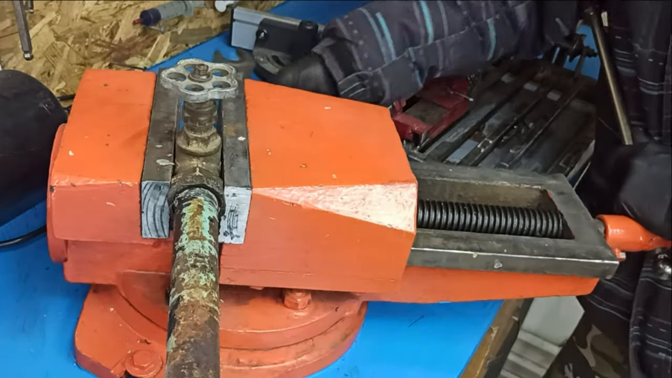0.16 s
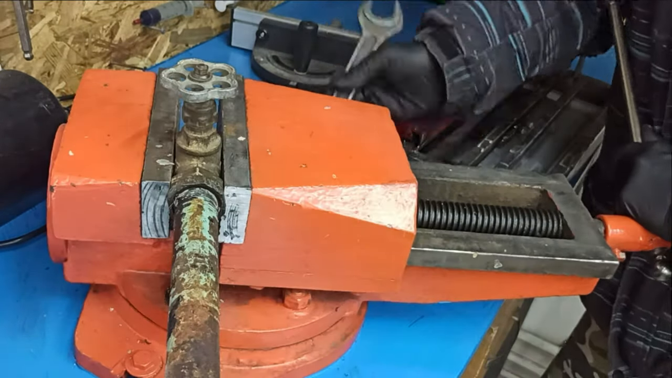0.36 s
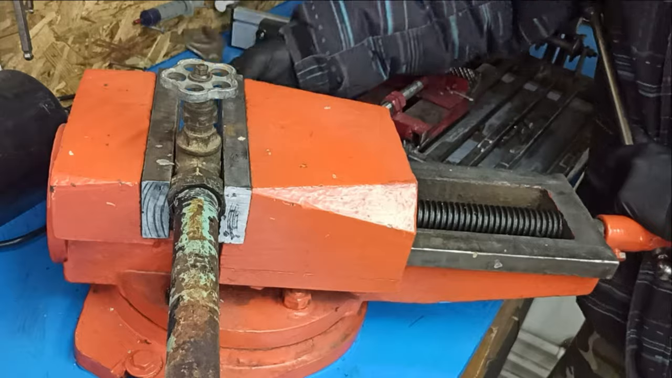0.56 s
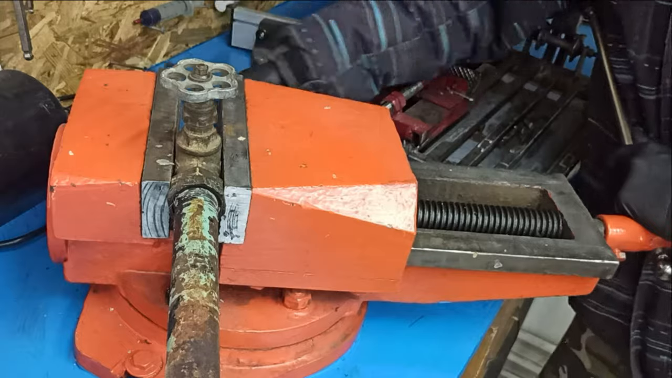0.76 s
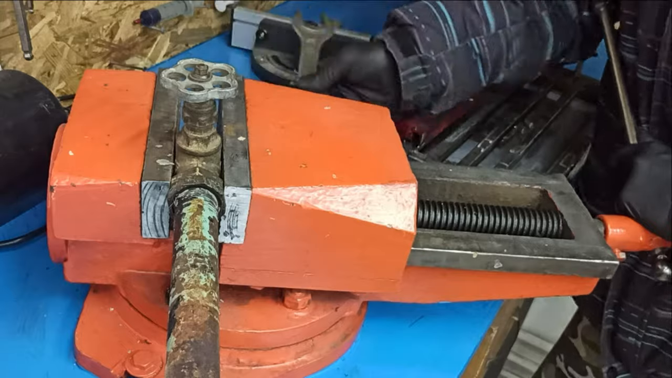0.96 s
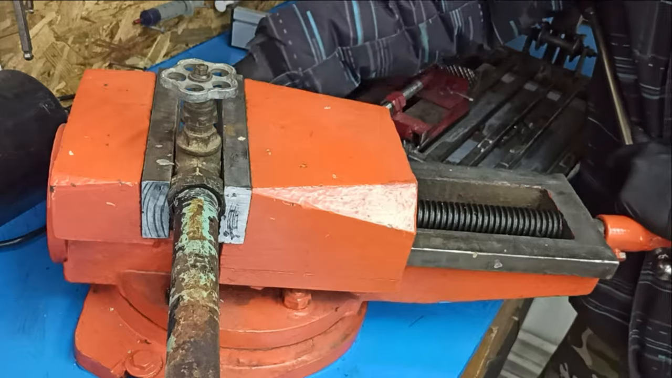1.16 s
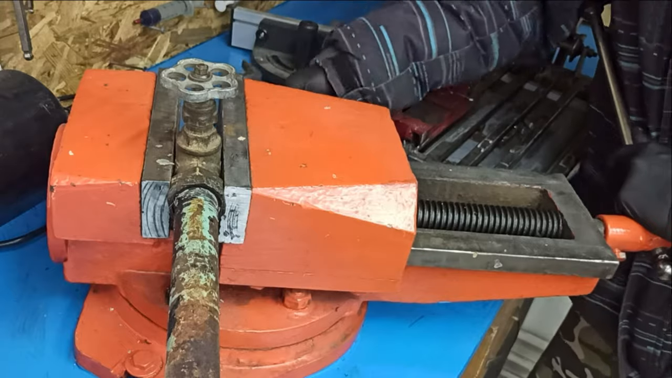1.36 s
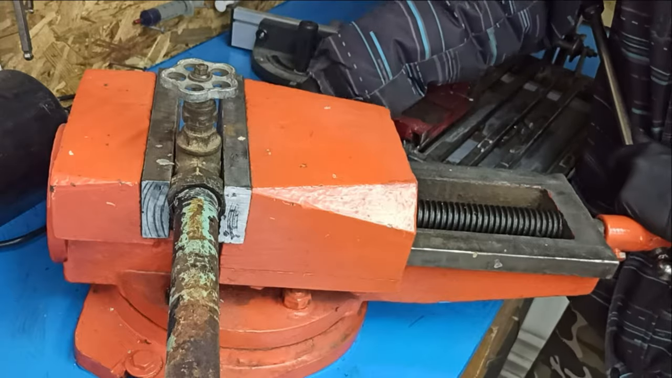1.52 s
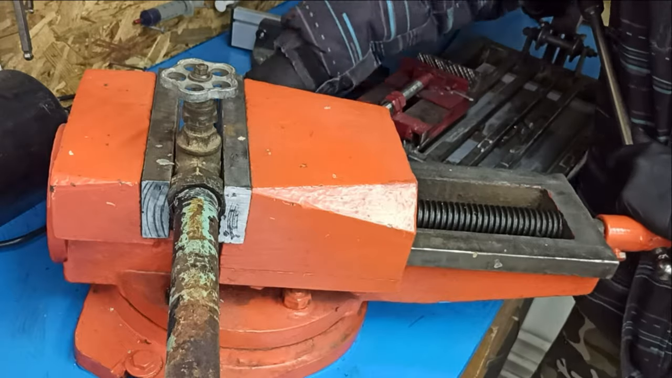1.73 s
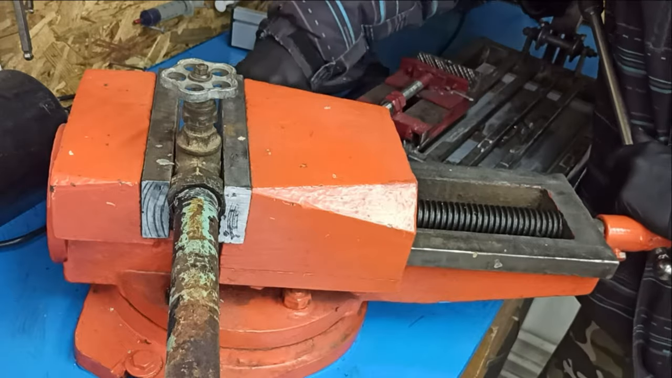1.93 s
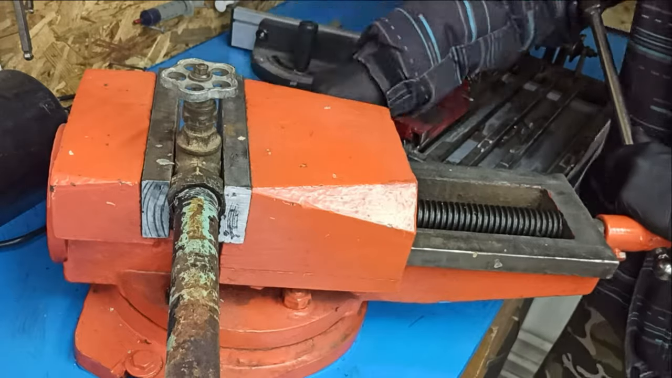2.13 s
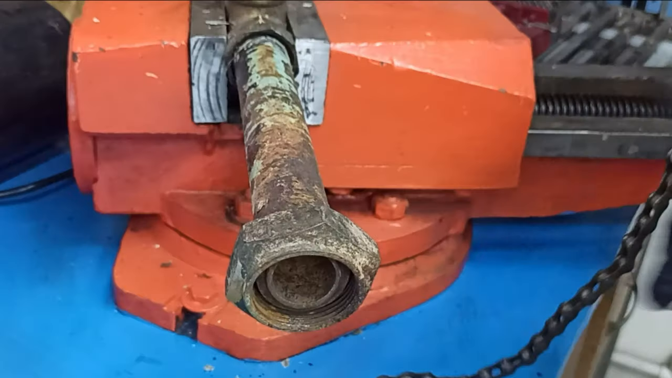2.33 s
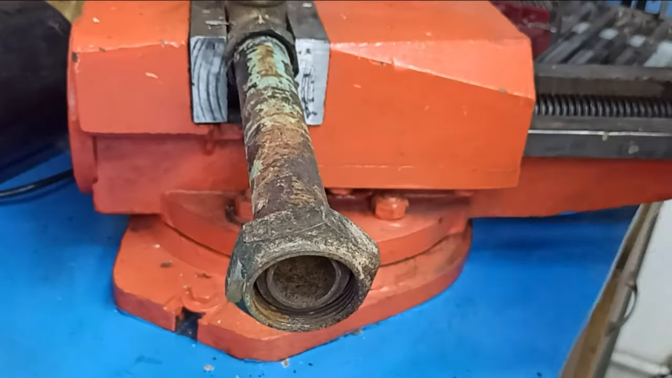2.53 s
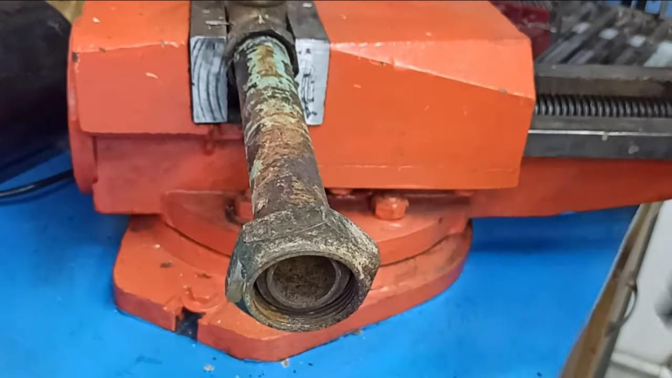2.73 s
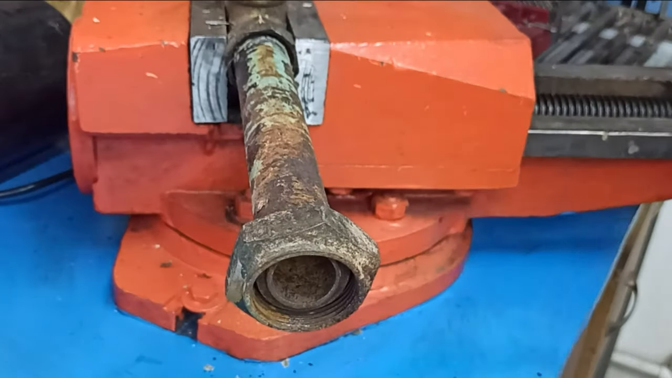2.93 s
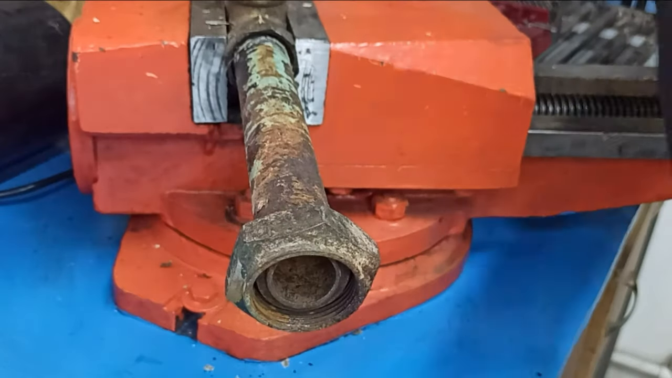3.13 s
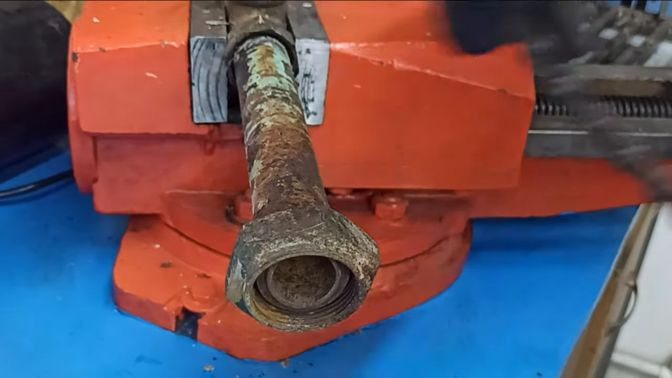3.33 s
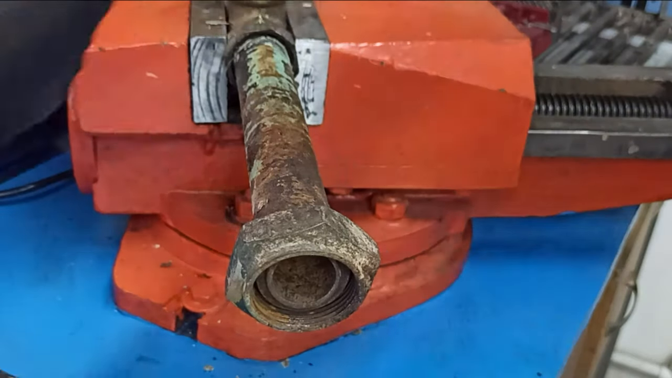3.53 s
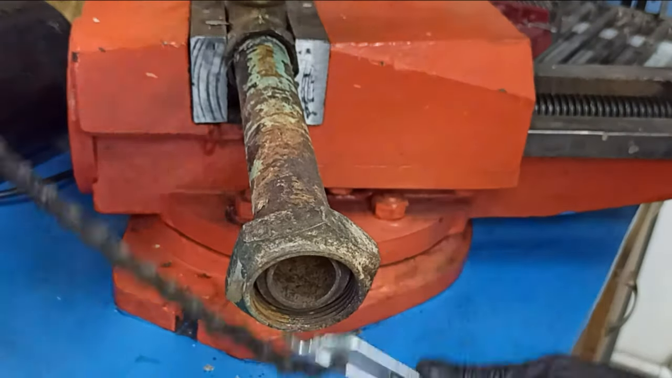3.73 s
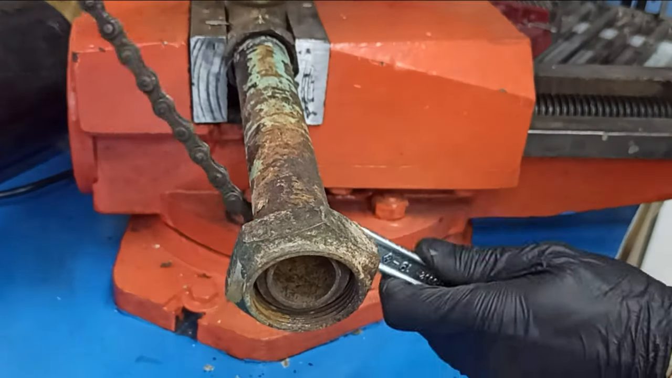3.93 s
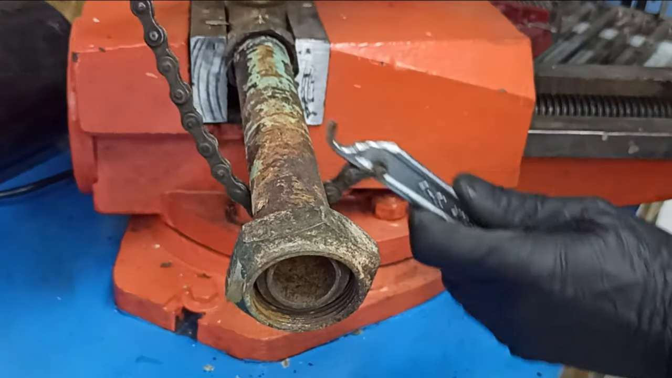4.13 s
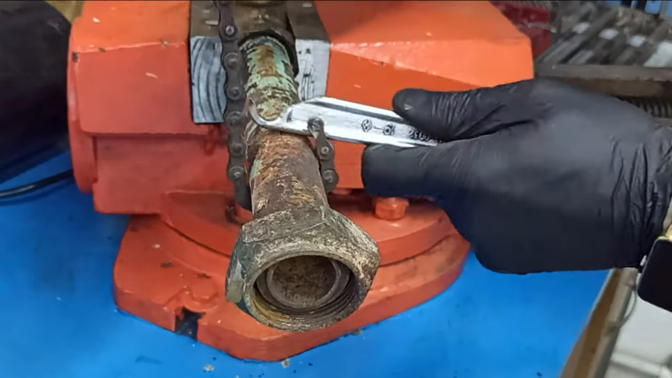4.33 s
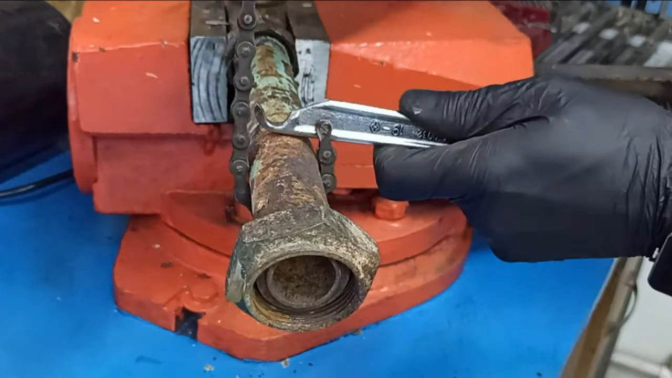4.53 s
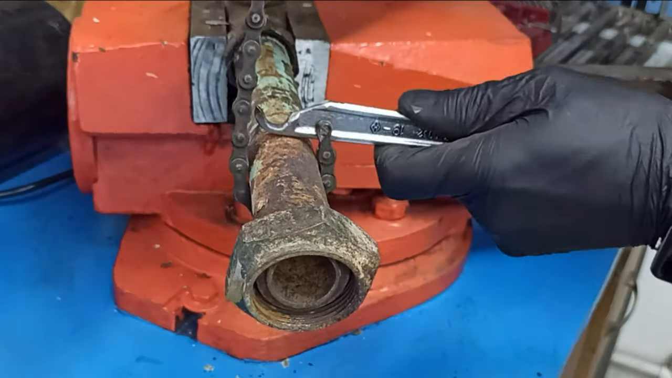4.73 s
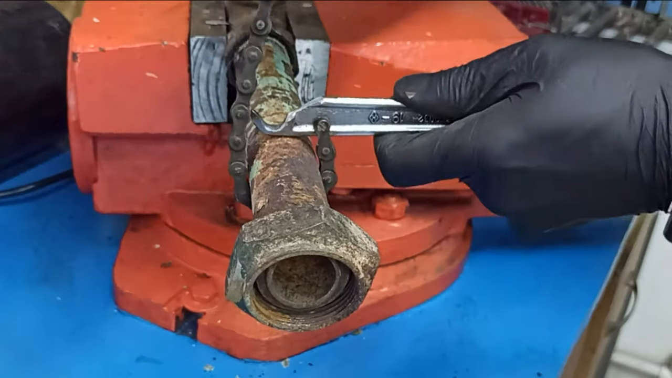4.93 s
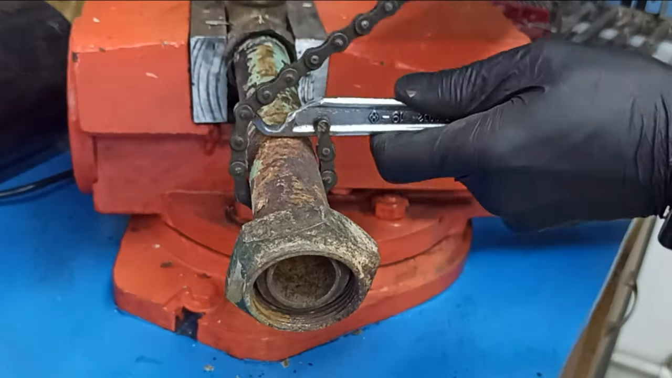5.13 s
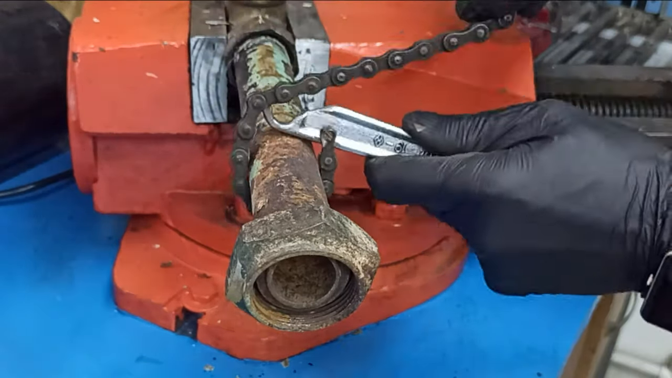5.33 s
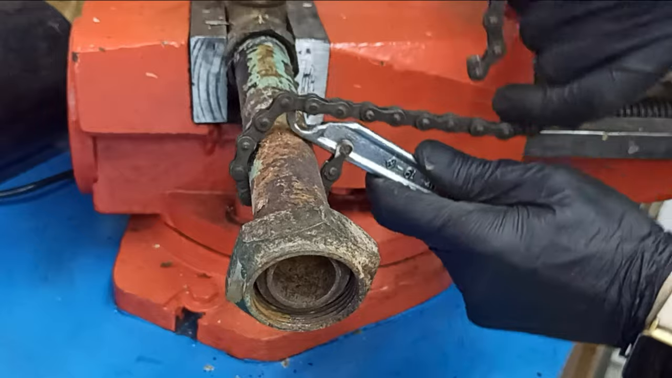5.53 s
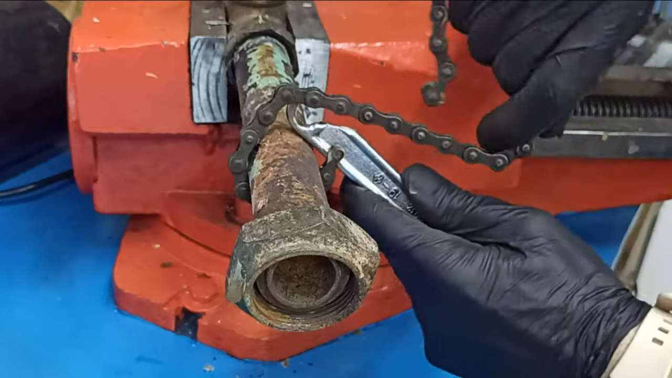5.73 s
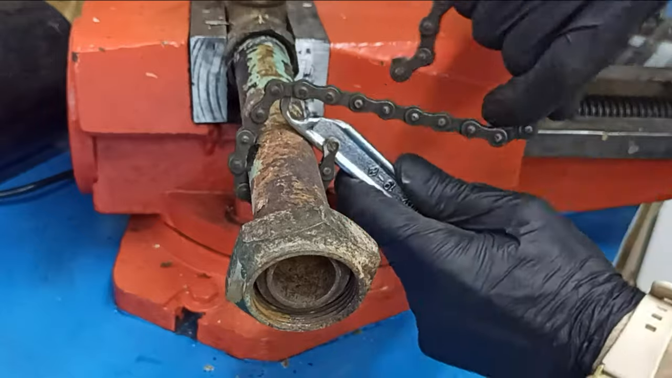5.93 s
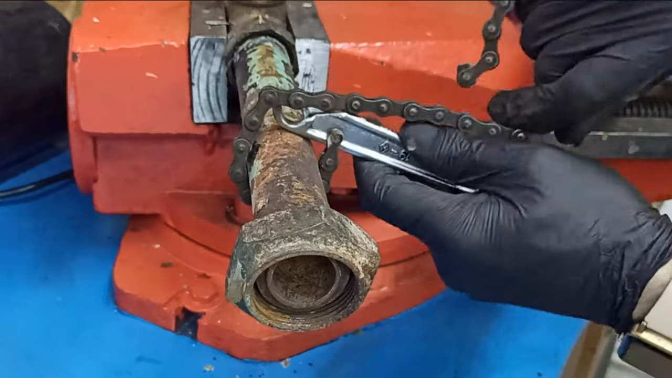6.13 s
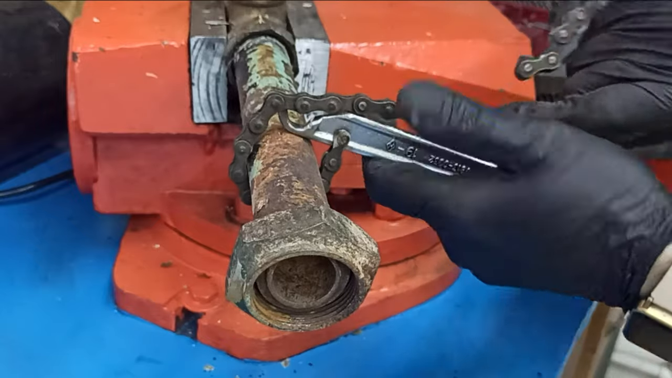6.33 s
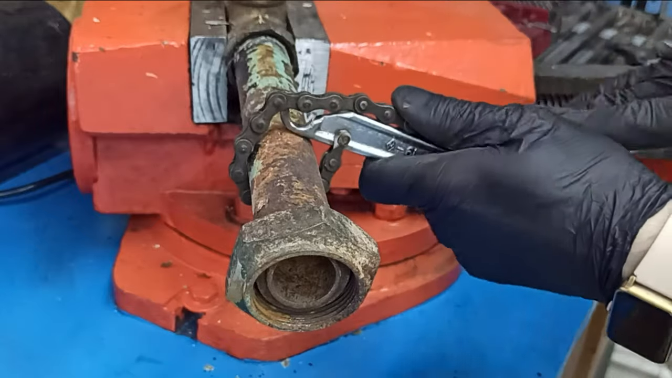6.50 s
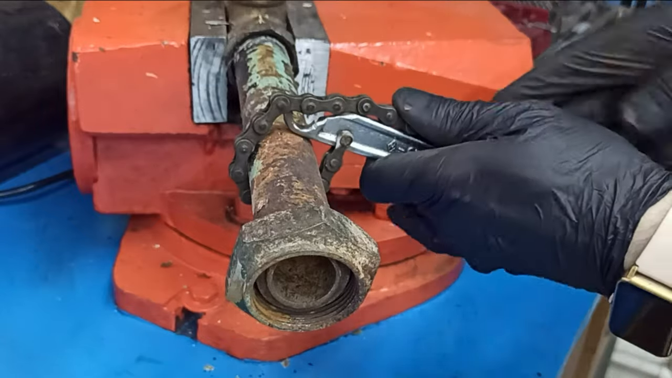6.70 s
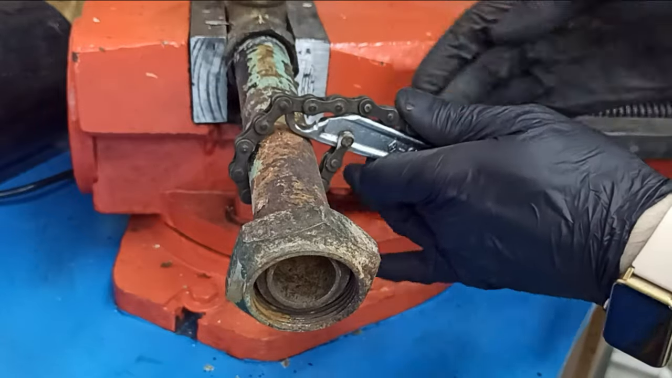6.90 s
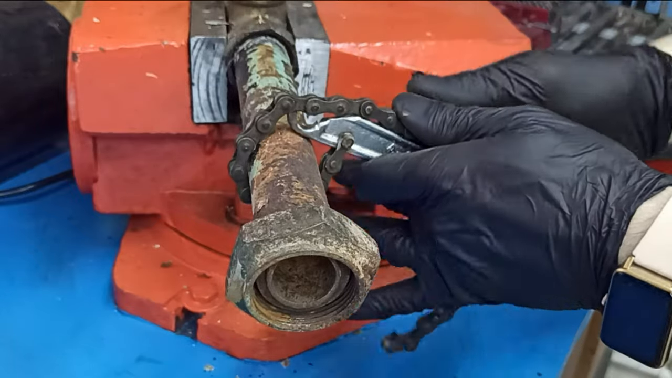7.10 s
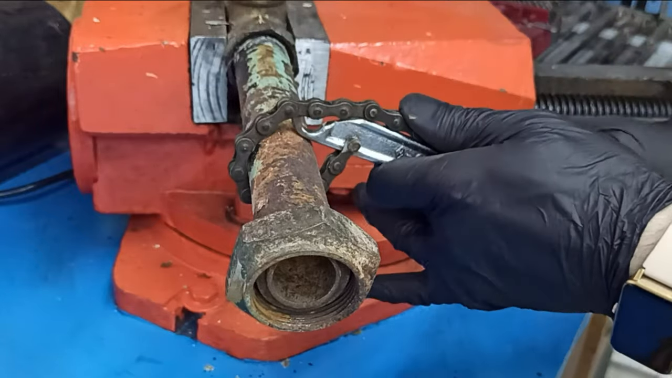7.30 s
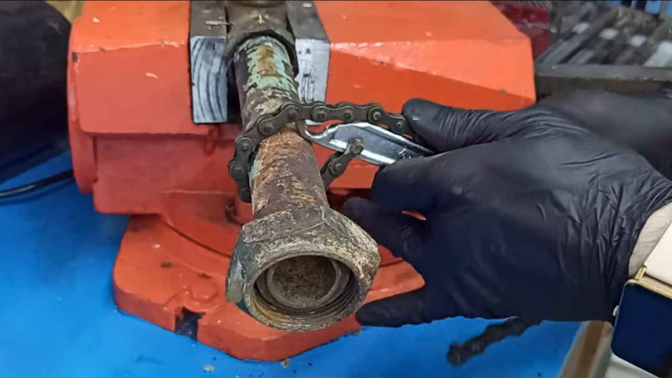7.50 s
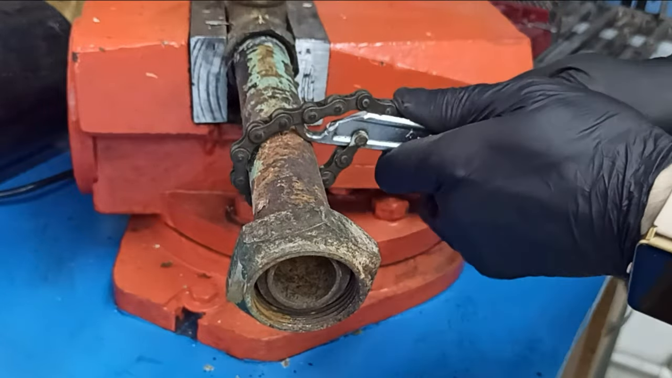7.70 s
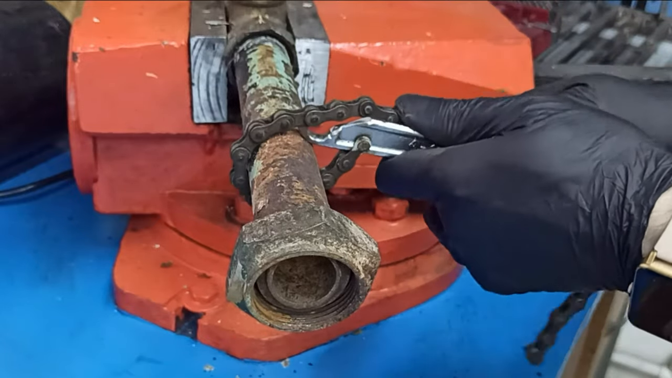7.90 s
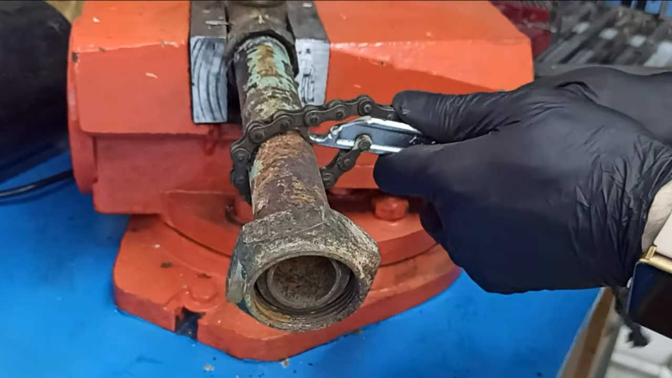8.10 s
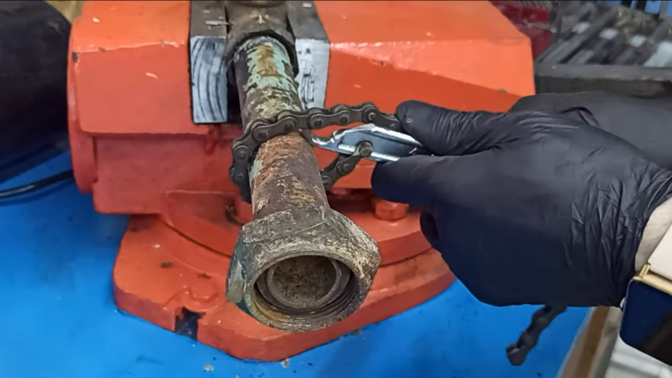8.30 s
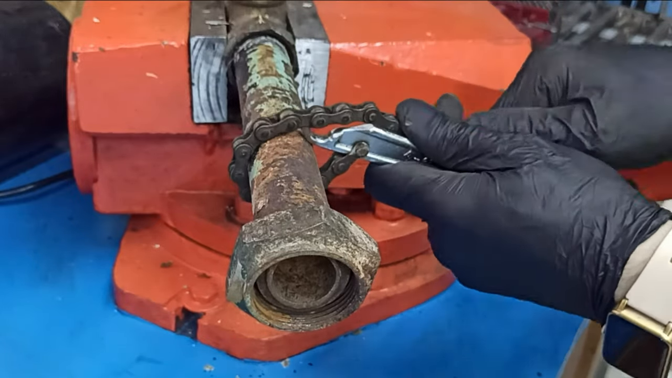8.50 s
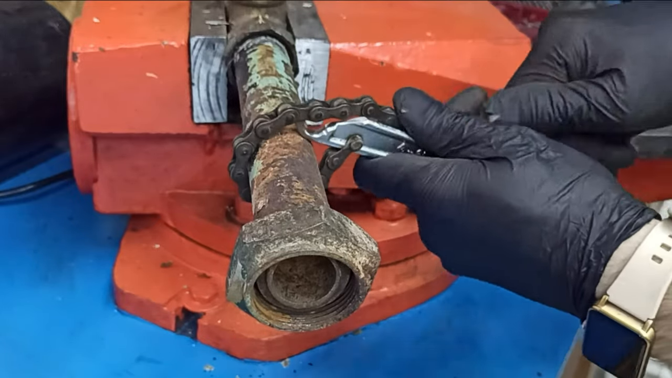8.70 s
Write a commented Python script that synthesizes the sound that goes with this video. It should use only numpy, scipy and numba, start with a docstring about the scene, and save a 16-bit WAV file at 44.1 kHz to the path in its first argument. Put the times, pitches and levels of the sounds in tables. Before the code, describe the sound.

Gloved hands rummage through clattering hand tools, drop a chain on steel, then wrap it around a rusty pipe with soft clinks and low hums.

```python
"""In a small workshop, at a bench with a heavy vice, a hand rummages among tools that knock and skid on the top.
Then, heard from a second, closer spot, a chain drops and drags over the steel top and wraps a clamped pipe.
Blows ring clusters of decaying modes; drags are gritty noise through modes; cloth is coloured grit.
The pipe hums as a wavering tone whenever the chain tugs it. A short room tail follows blows and drags;
rustle and hum stay close and dry, over a bed of still air."""
import sys
import numpy as np
from scipy import signal
from scipy.fft import rfft, irfft, next_fast_len
from scipy.io import wavfile
from scipy.ndimage import uniform_filter1d
from numba import njit

SR = 44100
rng = np.random.default_rng(int(sys.argv[2]) if len(sys.argv) > 2 else 0)


def wrap_up_sound(samples):
    """Save the sound to the file named by the first command line argument, as 16-bit audio."""
    columns = np.atleast_2d(samples).T
    # keep every value between -1 and 1, then stretch to whole-number steps
    tamed = np.clip(columns, -1, 1)
    steps = np.round(tamed * 32767).astype(np.int16)
    wavfile.write(sys.argv[1], SR, steps)


N = 385875

COLOUR_CHANGE_S = 2.232  # the colour of the whole sound changes here
TOP_HZ = 16900  # upper limit of what is heard

# Blows: thud, knock, clank and tick are relative to level_db; ring_s is a base that each mode scales.
# tools knocking on the bench: start_s, level_db, thud_db, clank_db, tick_db, ring_s
TOOL_KNOCKS = [(0.0528, -20, -0.5, -3, -3.5, 0.076), (0.164, -24, 0, -0.5, -8, 0.043),
               (0.197, -21.5, -9.5, -9, -16.5, 0.093), (0.278, -42.5, -19, -8, -7, 0.22),
               (0.388, -24, -3.5, -18, -30, 0.14), (0.4105, -20.5, -7, -55, -35, 0.082),
               (0.66, -31, -13, 2, -19, 0.057), (0.699, -12, -12.5, -26, -19, 0.035),
               (0.834, -35, -5.5, -27, -55, 0.11), (1.002, -30.5, -11.5, -12, -15.5, 0.083),
               (1.129, -29.5, -5, -6.5, -6, 0.067), (1.159, -36.5, -12, 21.5, -18, 0.076),
               (1.171, -10.5, -6.5, -22, -16, 0.067), (1.234, -10, -8.5, -7.5, -11.5, 0.043),
               (1.326, -43, -5, -19, -35, 0.13), (1.402, -31, 4, 2.5, 0.5, 0.098),
               (1.651, -0.5, -31, -16.5, -31.5, 0.089), (1.703, -9, -17.5, -14.5, -45, 0.098),
               (1.832, -37.5, -19.5, -16.5, -24, 0.16), (1.864, -24, -25.5, -28, -32, 0.11),
               (2.001, -20, -8.5, -3, -11, 0.12)]
# tools skidding on the bench: start_s, level_db, thud_db, clank_db, tick_db, length_s
TOOL_SKIDS = [(0.073, -44, 11, -9, -7, 0.015), (0.351, -33.5, -4.5, -28, -29, 0.025),
              (0.417, -33.5, -2, -0.5, -6, 0.039), (0.526, -29.5, -1, -21, -46, 0.035),
              (0.655, -25.5, -3, -10, 4, 0.018), (0.889, -39.5, -4, -3.5, -2.5, 0.037),
              (0.931, -38, -2, -3.5, -22, 0.028), (1.081, -33, -9.5, -14, -9.5, 0.028),
              (1.436, -34.5, -4.5, -8.5, -5.5, 0.025), (1.504, -30.5, -21.5, -17.5, -17.5, 0.024),
              (1.536, -39, -20.5, -21, -21, 0.027), (1.562, -24.5, -25.5, -3.5, -21, 0.02),
              (1.663, -15.5, -23.5, -17, -28.5, 0.022), (2.171, -40, -30, -5, -3, 0.023)]
# chain links hitting the steel top; the last row is a short, dull knock:
# start_s, level_db, thud_db, clank_db, tick_db, ring_s
STEEL_TOP_HITS = [(2.364, -13, -9, -4.5, -14, 0.06), (2.393, -21, -34, 5.5, -3.5, 0.084),
                  (2.435, -34, -32, 1.5, -16, 0.39), (2.509, -30, -32, -6, -33, 0.088),
                  (2.526, -44.5, 18, 25.5, 8.5, 0.097), (2.588, -48, 5, 18.5, 12.5, 0.04),
                  (2.61, -56.5, -3, 21, 14, 0.05), (2.691, -46, -3, -18, -28, 0.09),
                  (2.802, -50, -0.5, 16, -18, 0.12), (3.635, -47.5, 11, -45, -50, 0.0097)]
# chain and wrench hitting the pipe: start_s, level_db, knock_db, clank_db, tick_db, ring_s
PIPE_TAPS = [(3.91, -48, 15.5, 10.5, 6.5, 0.069), (4.074, -46, -10.5, -11.5, -0.5, 0.11),
             (4.2287, -60, -1.5, -2, -19, 0.16), (4.3479, -47, 9, 4.5, 0, 0.077),
             (4.3843, -45.5, -0.5, -5, -3, 0.14), (4.838, -60, -7, -7, 6.5, 0.1),
             (5.0013, -60.5, 0.5, -1.5, -11, 0.072), (5.208, -44, -2.5, -8, -0.5, 0.092),
             (5.645, -65.5, -0.5, 3, -2, 0.091), (6.1034, -58.5, -9, 4, -10.5, 0.096),
             (6.2096, -49.5, -33.5, -18, -1, 0.054), (6.3358, -38, -12, -7, -0.5, 0.074),
             (6.3888, -45, -28, -24, -1, 0.025), (6.543, -51, -15, -2.5, -1, 0.049),
             (6.824, -48, -3.5, -8, 8.5, 0.063), (7.0373, -53.5, -2, 1.5, 13, 0.087),
             (7.232, -49, -22, -5, 1, 0.2), (7.649, -58, -4, -5, 14, 0.095),
             (7.73, -36, -10.5, -6, 7.5, 0.063), (7.752, -42.5, -10.5, -1.5, 12, 0.093),
             (7.7822, -31, -8, -12, 9, 0.093), (7.7918, -28.5, -8, 0.5, 16, 0.026),
             (7.806, -56.5, 0, 15.5, -12, 0.22), (8.4104, -59.5, -9.5, -5, -10.5, 0.26),
             (8.53, -66, 10.5, 1.5, -7, 0.042), (8.624, -63.5, 3, 1, -12.5, 0.052),
             (8.7055, -58.5, 10.5, 8.5, -21, 0.026)]

# Resonances of each body, before a blow or a rub scales them: pitch_hz, level_db, ring_s (t60)
BENCH_MODES = [(225, -0.5, 0.37), (442, 2.5, 0.065), (558, 3, 0.096), (830.2, -10, 0.2), (1026, -7.5, 0.13),
               (1273, -8.5, 0.2), (1477, -10.5, 0.13), (1617, -7, 0.14), (1830, -13, .2), (2606, -6, 0.087),
               (3520, -5.5, 0.15), (5363, -10.5, 0.071)]
STEEL_TOP_MODES = [(398, 8.5, 0.21), (624, 10, 0.12), (880, 9.5, 0.031), (1173, 7.5, 0.063),
                   (1584, 2, 0.0907), (1764, -16.5, 0.084), (2564, -14, 0.13), (4850, 15, 0.0064)]
PIPE_MODES = [(115, -1, 0.21), (229.6, 4.5, 0.17), (385, -4.5, 0.086), (506.6, 3, 0.2), (639, 4, 0.22),
              (842, 4.5, 0.14), (1880, -11, 0.36), (2135, -6.5, 0.31), (2343, -4.5, 0.24),
              (2574, 0.5, 0.13)]
# something rubbed nearby: pitch_hz, level_db, ring_s (t60)
RUBBED_MODES = [(151, -15.5, 0.019), (293, 14, 0.021), (510, -1.5, 0.055), (822, -1, 0.072),
                (2127, -3, 0.02), (2310, -5.5, 0.037)]

# Moves of the hands: start_s (full level reached), hold_s, level_db
# tugs of the chain that set the clamped pipe humming: start_s, hold_s, level_db
CHAIN_TUGS = [(3.925, 0.049, -37), (4.0, 0.018, -50), (4.09, 0.06, -44.5), (4.18, 0.069, -53.5),
              (4.29, 0.091, -43), (4.37, 0.086, -40), (4.86, 0.02, -54), (4.93, 0.1, -58.5),
              (5.225, 0.02, -43), (5.33, .1, -55), (5.57, 0.11, -50.5), (5.82, 0.11, -48),
              (6.03, 0.061, -51.5), (6.16, .09, -56.5), (6.38, 0.0097, -47), (6.62, 0.33, -62.5),
              (6.92, 0.083, -57), (7.04, 0.072, -51.5), (7.28, 0.088, -51.5), (7.46, 0.13, -54),
              (7.69, 0.12, -44), (7.8, 0.03, -29), (7.865, 0.044, -42.5), (8.61, .01, -56),
              (8.72, 0.026, -48)]
# things dragged along: start_s, hold_s, level_db
DRAG_MOVES = [(0, 0.35, -58), (.52, 0.088, -56), (.672, 0.052, -52), (.88, 0.057, -47),
              (1.17, 0.094, -47.5), (1.33, 0.25, -55.5), (1.665, 0.033, -39.5), (2.04, 0.0041, -56.5),
              (2.1, 0.084, -65), (2.385, 0.053, -36.5), (2.5, 0.17, -46.5), (2.7, 0.062, -47.5),
              (2.78, 0.06, -46.5), (3.2, 0.074, -61.5), (3.305, 0.025, -61), (3.352, 0.011, -56),
              (3.41, 0.012, -51.5), (3.465, 0.016, -62), (4.02, 0.3, -71), (4.33, 0.12, -64.5),
              (5.212, 0.019, -65.5), (5.58, 0.08, -70), (6.3, 0.38, -70.5), (6.83, 0.012, -58),
              (7.03, 0.56, -70), (7.66, 0.076, -67.5), (7.79, 0.047, -57), (8.66, 0.1, -70)]
# sleeves and gloves: start_s, hold_s, level_db
CLOTH_MOVES = [(.05, 0.17, -67), (.38, 0.092, -61.5), (.685, 0.0077, -55), (.885, 0.036, -59),
               (1.17, 0.014, -49.5), (1.42, 0.0075, -52), (1.665, .03, -65), (2.005, 0.06, -63.5),
               (2.24, 0.044, -65), (2.385, 0.6, -60.5), (2.965, 0.15, -59.5), (3.135, 0.0073, -54),
               (3.185, 0.015, -57), (3.21, 0.029, -58.5), (3.29, .2, -63.5), (3.912, 0.011, -75.5),
               (4.27, .06, -75), (4.35, 0.035, -65), (6.03, 0.33, -74.5), (6.335, 0.045, -61.5),
               (6.5, 0.1, -66), (6.69, 0.011, -58), (6.85, 0.071, -65.5), (7.04, 0.04, -56.5),
               (7.125, 0.012, -54.5), (7.235, .015, -61), (7.28, 0.026, -53.5), (7.42, 0.097, -64.5),
               (7.47, 0.022, -57.5), (7.565, 0.018, -56), (7.775, 0.074, -55.5), (8.42, 0.052, -61.5),
               (8.585, 0.038, -59.5)]
# swell (dB per s), fade (dB per s), level at rest (dB)
TUG_SWELL, TUG_FADE, TUG_REST_DB = 910, 210, -68
DRAG_SWELL, DRAG_FADE, DRAG_REST_DB = 1600, 245, -77
RUSTLE_SWELL, RUSTLE_FADE, RUSTLE_REST_DB = 260, 200, -87.5

# the pipe swinging in the vice: centre pitch (Hz), pitch wander (fraction) and level wobble (dB) per unit of walk
HUM_HZ, HUM_WANDER, HUM_WOBBLE_DB = 138.5, 0.037, 2.9

# spectral colour of everything before COLOUR_CHANGE_S: pitch_hz, level_db
FIRST_PART_COLOUR = [(60, -29.5), (110, -31), (150, -14), (185, -5.5), (4000, 0), (8800, -2.5), (9300, 8.5),
                     (9800, -9), (12000, -6.5), (12600, 3), (15600, 4), (16000, -19), (17000, -22.5)]
# spectral colour of everything from COLOUR_CHANGE_S on: pitch_hz, level_db
SECOND_PART_COLOUR = [(50, -24.5), (100, -2), (4000, 2), (5600, 5), (5900, -3), (7200, -2), (7500, 7),
                      (10200, 2), (10500, -11.5), (13700, -21.5), (13900, -5.5), (15600, 0), (16000, -34.5),
                      (17000, -25.5)]
# colour of dragging grit: pitch_hz, level_db
DRAG_COLOUR = [(100, -30), (250, -10.5), (450, 5.5), (1000, 5.5), (2000, -12), (3500, -9.5), (6000, -16),
               (16000, -14.5)]
# colour of rubbing cloth: pitch_hz, level_db
CLOTH_COLOUR = [(500, -25), (1500, -13.5), (3000, -8.5), (5000, -4.5), (9000, 0), (16000, -5.5)]
# clinking links by pitch: pitch_hz, level_db
RATTLE_COLOUR = [(150, -19.5), (350, 4), (800, -2), (1600, -3), (3500, -8.5), (5500, -14), (9500, -18.5)]
# still air of the shop: pitch_hz, level_db
AIR_COLOUR = [(25, -15.5), (60, -8), (130, 5), (300, -4.5), (1000, -17), (4000, -27), (16000, -32)]
AIR_DB = -65
# decay of the small room: pitch_hz, ring_s (t60)
ROOM_DECAY = [(100, 0.3), (1000, 0.14), (4000, 0.2), (16000, 0.02)]
ROOM_DB = -8.5  # tail against the direct sound
BENCH_ANCHORS_HZ = (250, 900, 3300, 10000)  # where thud, blow, clank and tick levels apply


def undb(db):
    """Gain of a level in dB."""
    return 10 ** (np.asarray(db) / 20)


def on_log(hz, table):
    """Value of a (Hz, value) table, straight on a log frequency axis."""
    table_hz, value = np.transpose(table)
    return np.interp(np.log(hz + 1), np.log(table_hz), value)  # + 1 keeps 0 Hz finite


def colour(x, table):
    """Filter by a (Hz, dB) table."""
    size = next_fast_len(len(x) + 8192)
    gain = undb(on_log(np.fft.rfftfreq(size, 1 / SR), table))
    return irfft(rfft(x, size) * gain, size)[:len(x)]


def unit(x):
    """Scale to rms 1."""
    return x / np.sqrt(np.mean(x ** 2))


def walk(rate):
    """Random values, one every 1 / rate s, smoothed so that each slides into the next."""
    step = int(SR / rate)
    held = np.repeat(rng.standard_normal(N // step + 1), step)
    return uniform_filter1d(held, step)[:N]


def moves(table, swell, fade, rest_db):
    """Gain over time: each move swells, holds and fades; moves that overlap add their power."""
    t = np.arange(0, N + 64, 64) / SR
    start, hold, db = np.array(table, float).T[:, :, None]
    db = db - swell * np.maximum(start - t, 0) - fade * np.maximum(t - start - hold, 0)
    gain = np.sqrt(np.sum(undb(db) ** 2, axis=0) + undb(rest_db) ** 2)
    return np.interp(np.arange(N) / SR, t, gain)


@njit
def ring(starts, hz, gain, t60, size):
    """Sum of decaying sines, each starting at its own sample and running to -60 dB."""
    out = np.zeros(size)
    for m in range(len(hz)):
        turn = np.exp(2j * np.pi * hz[m] / SR - np.log(1000) / (t60[m] * SR))
        z = gain[m] + 0j
        for i in range(starts[m], min(size, starts[m] + int(t60[m] * SR))):
            z *= turn
            out[i] += z.imag
    return out


def resonate(force, modes, ring_share=0.4):
    """A steady force into a set of modes; rubbing contact shortens their ring."""
    hz, db, t60 = np.array(modes, float).T
    body = ring(np.zeros(len(hz), np.int64), hz, undb(db), t60 * ring_share, SR // 2)
    return unit(signal.fftconvolve(force, body)[:N])


def grit(rate, scatter_db):
    """Dense micro-impacts of uneven size, on average `rate` per second."""
    hit = rng.random(N) < rate / SR
    return hit * rng.standard_normal(N) * undb(scatter_db * rng.exponential(size=N))


def still_air():
    """Steady noise with the colour of the shop's still air."""
    return unit(colour(rng.standard_normal(N), AIR_COLOUR)) * undb(AIR_DB)


def dragging():
    """Rough contact is a stream of micro-impacts that shakes whatever body lies under it."""
    t = np.arange(N) / SR
    force = grit(5900, 1.8)
    plain = unit(colour(force, DRAG_COLOUR))
    tools_on_bench = plain + 0.28 * resonate(force, BENCH_MODES)
    chain_on_steel = chain_links() + 0.21 * plain + 0.33 * resonate(force, STEEL_TOP_MODES[:1])
    dull_rub = 0.26 * plain + 1.26 * resonate(grit(2500, 1.6), RUBBED_MODES, 0.96)
    chain_on_pipe = plain + 0.47 * resonate(force, PIPE_MODES[1:])
    # what is dragged changes over time
    drag = np.select([t < COLOUR_CHANGE_S, t < 3.0, t < 3.7], [tools_on_bench, chain_on_steel, dull_rub], chain_on_pipe)
    return drag * moves(DRAG_MOVES, DRAG_SWELL, DRAG_FADE, DRAG_REST_DB) * undb(2.0 * walk(40))


def cloth_rustle():
    """Sleeves and gloves: many tiny coloured impacts with a quickly wavering level."""
    cloth = unit(colour(grit(6000, 0.61), CLOTH_COLOUR))
    return cloth * moves(CLOTH_MOVES, RUSTLE_SWELL, RUSTLE_FADE, RUSTLE_REST_DB) * undb(3.0 * walk(70))


def blows(table, t60_s, contact_s, modes, anchors_hz, modes_db, dense_db, damp, snap=0.063, spot_db=5.0,
          spread=0.084, rebound_db=-3.5, bounces=3, size=9, count=640):
    """Each blow rings a cluster of close modes round each resonance, and a crowd of short ones that crack."""
    hz_body, db_body, t60_body = np.repeat(np.array(modes, float).T, size, axis=1)
    near = len(hz_body)  # the first modes cluster round the resonances; the rest are the crowd
    t60_s, contact_s = np.broadcast_to(t60_s, len(table)), np.broadcast_to(contact_s, len(table))
    draws = rng.random((len(table), 4, count))
    rows = []
    for row, decay, contact, u in zip(table, t60_s, contact_s, draws):
        start, blow, thud, clank, tick = row[:5]
        tone = sorted(zip(anchors_hz, blow + np.array([thud, 0, clank, tick])))
        # the crowd: high modes die sooner
        hz = 190 * 84 ** (u[0] ** 0.58)
        life = decay * (hz / 1000) ** -damp * (0.013 + 0.83 * u[1] ** 2.9)
        db = np.full(count, dense_db)
        # the clusters: no two blows alike
        shift = 1 + 0.08 * np.repeat(u[2, -len(modes):] - 0.5, size)
        hz[:near] = hz_body * (1 + spread * (u[0, :near] - 0.5)) * shift
        life[:near] = t60_body * (decay / 0.17) ** 0.6 * (0.32 + 0.99 * u[1, :near])
        db[:near] = db_body + modes_db
        # modes that start in step add up to a sharp snap
        gain = undb(on_log(hz, tone) + db) * (2 * u[2] - 1 + snap)
        # each spot favours other resonances
        gain[:near] *= np.repeat(undb(spot_db * (2 * u[1, :len(modes)] - 1)), size)
        # the contact is a few quick touches, each starting its share of the modes
        touch = np.resize(np.r_[0, u[3, 1:bounces] ** 1.5], count)
        gain *= np.where(touch > 0, undb(rebound_db), 1)
        rows.append([(start + contact * touch) * SR, hz, gain, np.clip(life, 0.003, 0.6)])
    starts, hz, gain, life = np.concatenate(rows, axis=1)
    return ring(starts.astype(np.int64), hz, gain, life, N)


def tool_knocks():
    """Tools strike the bench top in a few touches within 5 ms and ring its resonances."""
    knock = np.array(TOOL_KNOCKS)
    return blows(knock, knock[:, 5], 0.005, BENCH_MODES, BENCH_ANCHORS_HZ, modes_db=-13.0, dense_db=-12.0,
                 damp=0.099, spot_db=4.0, spread=0.17, size=16)


def tool_skids():
    """Tools skid as a chatter of touches spread over the length of the slide."""
    skid = np.array(TOOL_SKIDS)
    return blows(skid, 0.035, skid[:, 5], BENCH_MODES, BENCH_ANCHORS_HZ, modes_db=-7.0, dense_db=-14.5,
                 damp=0.68, rebound_db=0.5, bounces=13)


def chain_links(count=12000, size=24):
    """Chain links jostling: each tiny clink rings briefly at its own pitch, a handful at a time."""
    u = rng.random((count, 4)).T
    start = np.repeat(COLOUR_CHANGE_S + 0.88 * u[0, ::size], size) * SR
    hz = 300 * 36 ** (u[1] ** 0.6)
    handful_db = np.repeat(9 * u[2, ::size], size)
    gain = undb(on_log(hz, RATTLE_COLOUR) + handful_db) * (2 * u[3] - 1)
    clinks = ring(start.astype(np.int64), hz, gain, 0.015 + 0.15 * u[0] ** 2, N)
    return clinks / np.sqrt(np.mean(clinks[int(COLOUR_CHANGE_S * SR):3 * SR] ** 2))  # rms 1 from COLOUR_CHANGE_S to 3 s


def steel_top_hits():
    """Falling links, and last a short dull knock: two quick touches each ring the modes of the steel top."""
    hit = np.array(STEEL_TOP_HITS)
    return blows(hit, hit[:, 5], 0.0029, STEEL_TOP_MODES, (250, 900, 3300, 8500), modes_db=-14.5,
                 dense_db=-13.0, damp=0.042, snap=0.023, bounces=2)


def pipe_taps():
    """Chain and wrench tap the clamped pipe, ringing every mode but its lowest."""
    tap = np.array(PIPE_TAPS)
    # anchors in the order knock, blow, clank, tick
    return blows(tap, tap[:, 5], 0.007, PIPE_MODES[1:], (685, 4430, 2450, 9100), modes_db=-13.0,
                 dense_db=-13.5, damp=0.47, spread=0.14, spot_db=1.5, rebound_db=0.0, size=16)


def pipe_hum():
    """The pull of the chain makes the pipe swing: a wavering tone over noise in its three lowest modes."""
    phase = 2 * np.pi * np.cumsum(HUM_HZ * (1 + HUM_WANDER * walk(22))) / SR
    swing = np.sin(phase) * undb(HUM_WOBBLE_DB * walk(30))
    body = resonate(rng.standard_normal(N), PIPE_MODES[:3], 0.38)
    return (1.25 * swing + 0.34 * body) * moves(CHAIN_TUGS, TUG_SWELL, TUG_FADE, TUG_REST_DB)


def room(x):
    """Adds a tail of octave bands of noise that decay at their own rates."""
    t = np.arange(SR // 2) / SR
    tail = 0
    for hz in 90 * 2.0 ** np.arange(8):
        band = signal.butter(2, [hz / 2 ** 0.5, hz * 2 ** 0.5], "bandpass", fs=SR, output="sos")
        noise = signal.sosfilt(band, rng.standard_normal(len(t)))
        tail = tail + noise * 1000 ** (-t / on_log(hz, ROOM_DECAY))
    tail = tail * np.clip(t / 0.00039, 0, 1)  # fades in over 0.39 ms
    tail = tail / np.sqrt(np.sum(tail ** 2))
    return x + undb(ROOM_DB) * signal.fftconvolve(x, tail)[:N]


def scene():
    """Blows and drags in the room, with cloth, hum and still air laid in dry."""
    impacts = tool_knocks() + tool_skids() + steel_top_hits() + pipe_taps()
    return (still_air() + room(dragging()) + cloth_rustle() + room(impacts) + pipe_hum())[None]


def record(dry):
    """The parts before and after COLOUR_CHANGE_S each have their own spectral colour; a steep low-pass cuts the
    top."""
    first_part = np.arange(N) < COLOUR_CHANGE_S * SR
    heard = np.where(first_part, colour(dry[0], FIRST_PART_COLOUR), colour(dry[0], SECOND_PART_COLOUR))
    low_pass = signal.ellip(8, 0.2, 70, TOP_HZ, fs=SR, output="sos")
    return signal.sosfilt(low_pass, heard)[None]


dry = scene()
out = record(dry)
wrap_up_sound(out)
```